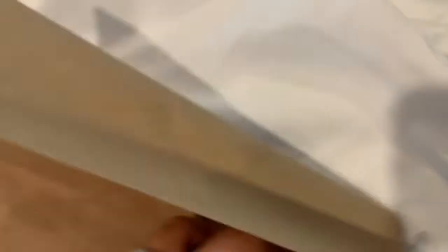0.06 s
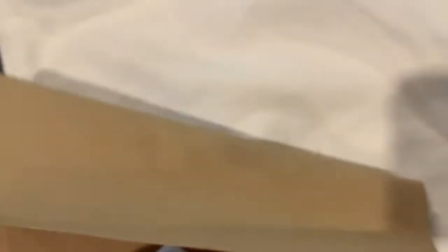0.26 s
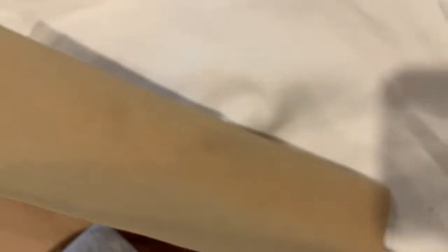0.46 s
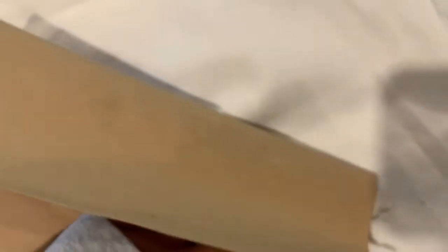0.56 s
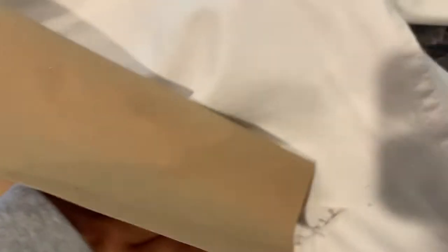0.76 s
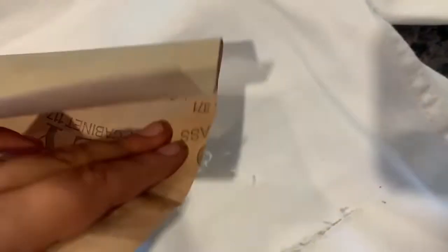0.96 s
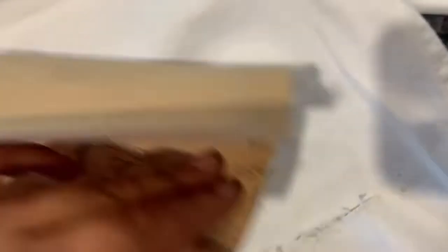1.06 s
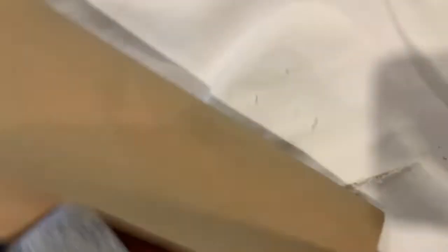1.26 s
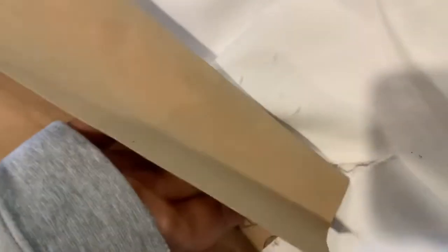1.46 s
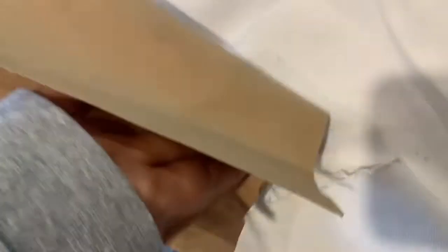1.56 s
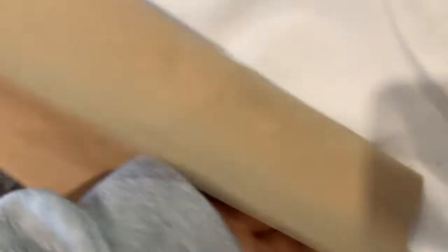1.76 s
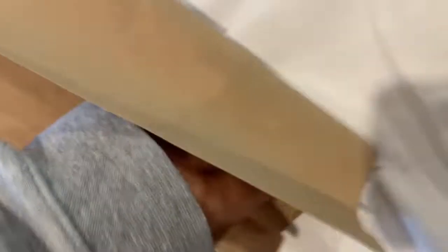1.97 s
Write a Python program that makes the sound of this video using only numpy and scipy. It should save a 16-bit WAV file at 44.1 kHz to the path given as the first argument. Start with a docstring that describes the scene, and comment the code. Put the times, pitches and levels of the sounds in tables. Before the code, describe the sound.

Folded sandpaper scrapes over thick cloth in gritty strokes, with sharp snags and soft table thumps

```python
"""A folded sheet of sandpaper is rubbed over thick cloth on a table, close to a small two-port microphone.
From the start, grit catching fibres gives a dense hiss (filtered random clicks), the folded sheet rings
near 1 kHz in coarser snags, and the hand's pushes make the table boom (noise through low resonances).
Single sharp snags, each a decaying tone with a noisy crack, come early and again after a quieter moment.
From about 1.2 s a few soft blows of the hand add low tones; faint room noise lies under it all."""
import sys
import numpy as np
from scipy import signal
from scipy.fft import rfft, irfft
from scipy.io import wavfile

SR = 44100
rng = np.random.default_rng(int(sys.argv[2]) if len(sys.argv) > 2 else 0)


def log_audio(samples):
    """Write samples as a 16-bit WAV file to the path given in sys.argv[1]."""
    # one column per channel
    frames = np.atleast_2d(samples).T
    # limit to full scale, then quantise
    limited = np.clip(frames, -1, 1)
    pcm = np.round(limited * 32767).astype(np.int16)
    wavfile.write(sys.argv[1], SR, pcm)


N = 88288  # length of the sound in samples, about 2 s


def from_db(db):
    """Turn decibels into a gain."""
    return 10 ** (np.asarray(db) / 20)


def rms_one(x):
    """Scale to an rms (average strength) of 1."""
    return x / np.sqrt(np.mean(x ** 2) + 1e-20)


def in_time(rows):
    """Draw straight lines between the rows of a table: one value per sample for each column after time."""
    times_s, *columns = np.transpose(rows)
    sample_times_s = np.arange(N) / SR
    return [np.interp(sample_times_s, times_s, column) for column in columns]


def drift(rate_hz):
    """Smooth random wandering with rms 1: noise with everything much faster than rate_hz weakened."""
    settle = 4000  # samples dropped while the filter starts up
    r = np.exp(-2 * np.pi * rate_hz / SR)
    wander = signal.lfilter([1], [1, -2 * r, r * r], rng.standard_normal(N + settle))
    return rms_one(wander[settle:])


def grains(per_s, spread_db):
    """Random clicks of either sign, one row for the direct sound and one for the scattered sound."""
    size_db = spread_db * np.minimum(rng.exponential(1, (2, N)), 5)
    size = from_db(size_db) * rng.choice([-1, 1], (2, N))
    happens = rng.random((2, N)) < per_s / SR
    return size * happens + 1e-18


def resonate(x, peaks):
    """Ring x through side-by-side resonances with alternating signs; rms 1."""
    out = 0
    for k, (hz, width_hz, db) in enumerate(peaks):
        r = np.exp(-np.pi * width_hz / SR)
        feedback = [1, -2 * r * np.cos(2 * np.pi * hz / SR), r * r]
        ringing = rms_one(signal.lfilter([1, 0, -1], feedback, x))
        out = out + (-1) ** k * from_db(db) * ringing
    return rms_one(out)


def filtered(x, order, hz, kind):
    """Keep only the part of x below, above or between the given frequencies."""
    return signal.sosfilt(signal.butter(order, hz, kind, fs=SR, output="sos"), x)


def coloured(x, spectrum):
    """Weight the frequencies of x by a curve of (frequency [Hz], level [dB]); rms 1."""
    hz, db = np.transpose(spectrum)
    log_hz = np.log(np.fft.rfftfreq(N, 1 / SR) + 1)
    gain = from_db(np.interp(log_hz, np.log(hz), db))
    return rms_one(irfft(rfft(x) * gain, N))


def slide(x, shift_hz):
    """Move every frequency of x by shift_hz, which may change in time."""
    turn = np.exp(2j * np.pi * np.cumsum(shift_hz) / SR)
    return np.real(signal.hilbert(x) * turn)


def patches(x):
    """Many narrow resonances of the bending sheet wander, swell and fade over the broad hiss."""
    SWELL_DB, SWELL_RATE_HZ = 4.5, 20.5
    WANDER_HZ, WANDER_RATE_HZ = 80, 2
    RING_WIDTH_HZ, RINGS_DB = 60, -8
    rings = 0
    for hz in np.geomspace(500, 9000, 48) * rng.uniform(1.0, 1.02, 48):
        ring = resonate(x, [(hz, RING_WIDTH_HZ, 0)])
        rings = rings + ring * from_db(SWELL_DB * drift(SWELL_RATE_HZ))
    # all the rings wander in pitch together
    wandering = slide(rms_one(rings), WANDER_HZ * drift(WANDER_RATE_HZ))
    return rms_one(x + from_db(RINGS_DB) * wandering)


def sandpaper():
    """Catching fibres gives clicks so dense that they hiss; sparser catches ring the folded sheet."""
    # strokes of the rubbing: (time [s], overall level [dB], coarse grit against it [dB],
    # ring of the sheet against it [dB]); the fixed _DB settings below are added to these
    rub = [(0.0, -64, 4.5, 5), (0.046, -39, -3.5, -4), (0.054, -43, -2.5, 7), (0.094, -52, 6, 4),
           (0.108, -49.5, 4.5, 6), (0.15, -50.5, 0.5, -3), (0.176, -58.5, 6.5, -3), (0.33, -56, 2, -1),
           (0.38, -49, 0.5, -9), (0.48, -48.5, 0, -1.5), (0.528, -58, -6.5, 3.5), (0.566, -39, -4.5, -3.5),
           (0.698, -39, -2.5, -4), (0.742, -47.5, 0, -1), (0.8, -31, -2.5, -10), (0.82, -35.5, 2, -5),
           (0.836, -38.5, 6, -12), (0.87, -42, -2.5, -7), (0.884, -59, 9, -19), (0.93, -60.5, -2, -8.5),
           (0.95, -59.5, -6, -25), (0.974, -76, 10, -4), (1.056, -75, 4, -8), (1.076, -65.5, 1, 1),
           (1.126, -75, 11.5, 0.5), (1.142, -68, 12.5, -14), (1.17, -80.5, 11, -4), (1.18, -63.5, 9, -23),
           (1.204, -35.5, -4.5, 2), (1.22, -46.5, 3.5, -18), (1.238, -45, -0.5, 1), (1.254, -42, 1, -12),
           (1.308, -44, -1, 1.5), (1.356, -38, -8, -3), (1.378, -35, -9, -7.5), (1.412, -47, -2, 1),
           (1.426, -59.5, 1, 2), (1.447, -64, 3, -8), (1.462, -39, -16, -8), (1.477, -40, -8.5, -6),
           (1.482, -30.5, -8, -12.5), (1.505, -35.5, -3.5, -5.5), (1.54, -42.5, -1.5, -3.5),
           (1.56, -56, 5, 7.5), (1.57, -60, 3.5, 1), (1.626, -82, 16, 1), (1.646, -62, 0.5, -1),
           (1.706, -85.5, 14, 4), (1.722, -53.5, 7.5, -7), (1.73, -40, -0.5, -7), (1.75, -49.5, 0.5, -2),
           (1.786, -27, -13, -4), (1.838, -35, -1.5, 0), (1.88, -53, 2.5, -10), (1.912, -62, 4.5, -3.5),
           (1.926, -44, -7, -8), (1.942, -39, -8, 1.5), (1.952, -32.5, -3.5, -7), (1.968, -50, 2, 4.5),
           (2, -57, 0, -4)]
    # colour of the grit hiss: (frequency [Hz], level [dB])
    grit_colour = [(200, -0.5), (600, -3.5), (1500, 7), (1900, 2.5), (2400, 5.5), (2800, 5), (4000, 1.5),
                   (5800, -6.5), (7500, -7.5), (10300, -1.5), (12500, -4), (14000, -4.5), (14900, -7),
                   (16000, -3.5)]
    # swelling and hollowing of the upper middle of the hiss: (time [s], level change [dB])
    rasp = [(.15, -2), (.45, 3), (.65, 1), (.85, 1.5), (1.14, 4.5), (1.27, -5.5), (1.38, 0), (1.8, -4.5),
            (1.95, 3)]
    # resonances of the folded sheet before bending: (frequency [Hz], width [Hz], level [dB])
    sheet_peaks = [(785, 420, -5.5), (1097, 160, 3.5), (1334, 430, -1.5), (2220, 83, -5.5)]
    # bending slides those resonances: (time [s], shift [Hz])
    bend = [(0, -0.5), (.3, 60.5), (.55, 79.5), (.7, -10), (.8, -110), (1.15, 40), (1.4, 49), (1.55, -30),
            (1.8, -120), (2, 20.5)]
    GRIT_PER_S, GRIT_SPREAD_DB = 20000, 2
    FLICKER_DB, FLICKER_RATE_HZ = 0.5, 22
    SPLIT_HZ = 5760  # the hiss below this is called coarse, above it fine
    FINE_DB, COARSE_DB, SHEET_DB = 5, 1.5, -0.5
    RASP_BAND_HZ = 2620, 4240
    SHEET_PER_S, SHEET_SPREAD_DB = 4000, 0

    rub_db, coarse_db, ring_db = in_time(rub)
    clicks = rms_one(grains(GRIT_PER_S, GRIT_SPREAD_DB))
    grit = coloured(patches(clicks), grit_colour) * from_db(FLICKER_DB * drift(FLICKER_RATE_HZ))
    coarse = rms_one(filtered(grit, 4, SPLIT_HZ, "low"))
    fine = rms_one(filtered(grit, 4, SPLIT_HZ, "high"))

    rasp_change = from_db(*in_time(rasp)) - 1
    coarse = coarse + rasp_change * filtered(coarse, 2, RASP_BAND_HZ, "band")

    sheet = resonate(grains(SHEET_PER_S, SHEET_SPREAD_DB), sheet_peaks)
    sheet = slide(sheet * from_db(SHEET_DB + ring_db), *in_time(bend))

    hiss = from_db(FINE_DB) * fine + from_db(COARSE_DB + coarse_db) * coarse
    return from_db(rub_db) * (hiss + sheet)


def table():
    """The hand's uneven pressure, made of noise, drives the table's broad resonances."""
    # push of the hand through the cloth into the table:
    # (time [s], boom level [dB], upper tones against it [dB]); LOW_DB and UPPER_DB are added
    push = [(0, -39, -18), (.04, -41, -2.5), (.15, -46, -7), (.19, -49, -9), (.27, -74.5, 13),
            (.51, -67.5, -9), (.56, -55.5, 5.5), (.7, -48, 0.5), (.76, -53, -3), (.82, -45, 1.5),
            (.9, -70, -2), (.98, -70.5, 7.5), (1.17, -96, -21), (1.2, -56, 5), (1.24, -40.5, 3.5),
            (1.3, -51, -20), (1.36, -47, -11), (1.42, -50.5, -8), (1.46, -63, -13), (1.5, -46, 1),
            (1.56, -55, 2), (1.63, -62, -5), (1.7, -77, -20), (1.73, -52, 4), (1.76, -31.5, -6.5),
            (1.8, -50, -15), (1.84, -49, 9), (1.87, -55, 3.5), (1.9, -47, -24), (1.93, -62, 13.5),
            (1.95, -51.5, 1.5), (2, -63, 2)]
    # low resonances of the table: (frequency [Hz], width [Hz], level [dB])
    low_peaks = [(47.2, 20, -6), (59.2, 22.7, -3), (114, 22, -8), (144, 70, -10.5)]
    # upper resonances of the table: (frequency [Hz], width [Hz], level [dB])
    upper_peaks = [(286, 108, 6.5), (482, 260, 0.5)]
    LOW_DB, UPPER_DB = -1.64, -3

    boom_db, upper_db = in_time(push)
    pressure = resonate(rng.standard_normal((2, N)), [(82, 410, 0)])
    low = resonate(pressure, low_peaks)
    upper = resonate(rng.standard_normal((2, N)), upper_peaks)
    return from_db(boom_db) * (from_db(LOW_DB) * low + from_db(UPPER_DB + upper_db) * upper)


def snags():
    """When the sheet catches sharply, a dull noisy crack and a tone start together and die within milliseconds."""
    # sharp snags of the sheet: (start time [s], level [dB], pitch [Hz], crack against the ring [dB])
    snag_list = [(0.031, -27, 1005, -2), (0.054, -19.5, 1130, -15), (0.112, -26, 670, 6),
                 (1.182, -38.5, 1190, -1), (1.2, -21, 1045, -5.5), (1.234, -25.5, 1150, -4),
                 (1.48, -33, 1070, -11), (1.505, -24, 1070, -18), (1.52, -32.5, 1080, -10),
                 (1.593, -37, 2280, -1.5), (1.78, -17, 860, -3.5), (1.924, -27.5, 880, -17)]
    RISE_S = 0.0026
    RING_T60_S, CRACK_T60_S = 0.014, 0.0079  # time to fall by 60 dB
    CRACK_BAND_HZ = 450, 2200

    out, t = np.zeros(N + SR), np.arange(SR // 20) / SR
    rise = np.minimum(t / RISE_S, 1)
    for start_s, db, hz, crack_db in snag_list:
        noise = rms_one(filtered(rng.standard_normal(len(t)), 4, CRACK_BAND_HZ, "band"))
        crack = from_db(crack_db - 60 * t / CRACK_T60_S) * noise
        ring = from_db(-60 * t / RING_T60_S) * np.sin(2 * np.pi * hz * t)
        out[int(start_s * SR):][:len(t)] += from_db(db) * rise * (ring + crack)
    return out[:N]


def thumps():
    """Each soft blow sounds two table tones; the upper one peaks sooner but fades more gently."""
    # soft blows of the hand on the table: (start time [s], level [dB], pitch of the low tone [Hz])
    blows = [(1.207, -26, 67.4), (1.511, -48, 59), (1.729, -33, 70), (1.802, -42, 82)]
    LOW_RISE_S, UPPER_RISE_S = 0.035, 0.021  # time from start to peak
    UPPER_HZ, UPPER_DB = 153.3, -8.5  # level against the low tone

    out, t = np.zeros(N + SR), np.arange(SR // 4) / SR
    low_swell = (t / LOW_RISE_S * np.exp(1 - t / LOW_RISE_S)) ** 5  # the power narrows the swell
    upper_swell = t / UPPER_RISE_S * np.exp(1 - t / UPPER_RISE_S)
    upper = upper_swell * from_db(UPPER_DB) * np.sin(2 * np.pi * UPPER_HZ * t)
    for start_s, db, hz in blows:
        low = low_swell * np.sin(2 * np.pi * hz * t)
        out[int(start_s * SR):][:len(t)] += from_db(db) * (low + upper)
    return out[:N]


def room_noise():
    """Steady faint noise of the room, strongest in the low frequencies."""
    ROOM_DB = -64.5
    # (frequency [Hz], level [dB])
    spectrum = [(40, -9), (100, 4), (250, 6.5), (600, -27), (3000, -13.5), (16000, -35)]
    return from_db(ROOM_DB) * coloured(rng.standard_normal((2, N)), spectrum)


def ports(direct, scattered):
    """The right port hears the direct sound shifted in phase, mixed with scattered sound."""
    # how the right port hears against the left:
    # (frequency [Hz], phase lead [rad], likeness [0-1], left minus right level [dB])
    port_curves = [(30, .3, .95, .5), (65, 0.01, .99, .4), (130, -1.3, .95, .1), (230, -2.5, .9, .3),
                   (290, -4.6, .8, 1.5), (340, -6.2, .85, 1.5), (430, -6.7, .85, 1.5),
                   (780, -6.3, .85, 3.5), (1100, -7, .9, 3.5), (1500, -9, .55, -.3), (2000, -8.5, .15, -.6),
                   (3000, -9.3, .35, -.6), (4600, -12.5, .45, -3.5), (5300, -12, .3, -4.5),
                   (6500, -12.5, .7, -.4), (8550, -9.4, .98, 0), (11000, -6.3, .93, 0),
                   (13350, -3.14, .98, 0), (15600, 0, .93, 0)]
    hz, *columns = np.transpose(port_curves)
    bins_hz = np.fft.rfftfreq(N, 1 / SR)
    lead, alike, pan_db = (np.interp(bins_hz, hz, column) for column in columns)
    alike = np.clip(alike, 0, 1)
    left = rfft(direct)
    shifted = alike * np.exp(1j * lead) * left
    right = shifted + np.sqrt(1 - alike ** 2) * rfft(scattered)
    return irfft([left * from_db(pan_db / 2), right * from_db(-pan_db / 2)], N)


def scene():
    """Add all sources, as a direct and a scattered row, and hear them through the two ports."""
    direct, scattered = sandpaper() + table() + snags() + thumps() + room_noise()
    return ports(direct, scattered)


def record(dry):
    """A steep low-pass filter cuts off the highest treble."""
    CUTOFF_HZ, RIPPLE_DB, REJECTION_DB = 15720, 0.5, 70
    low_pass = signal.ellip(12, RIPPLE_DB, REJECTION_DB, CUTOFF_HZ, fs=SR, output="sos")
    return signal.sosfilt(low_pass, dry)


dry = scene()
out = record(dry)
log_audio(out)
```